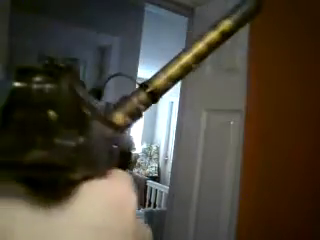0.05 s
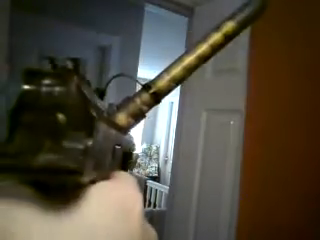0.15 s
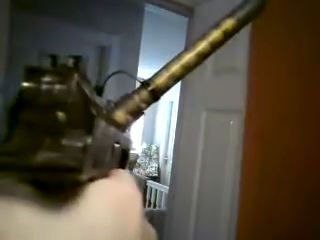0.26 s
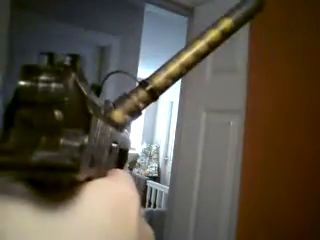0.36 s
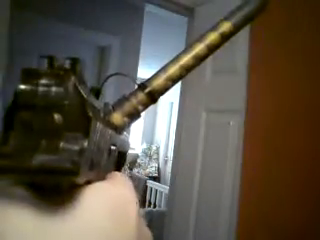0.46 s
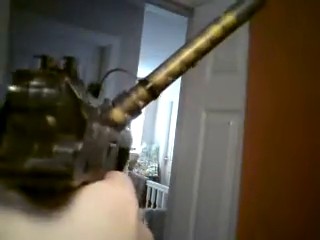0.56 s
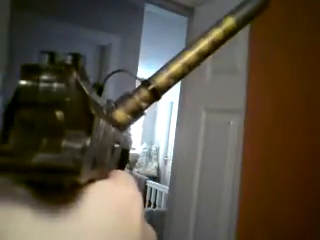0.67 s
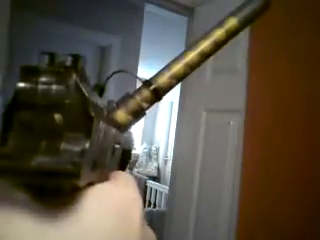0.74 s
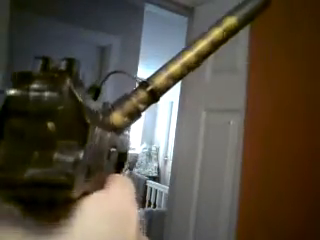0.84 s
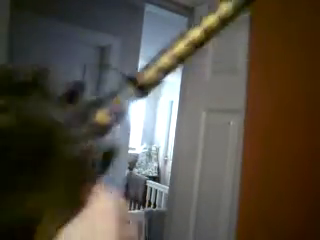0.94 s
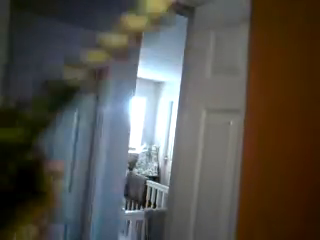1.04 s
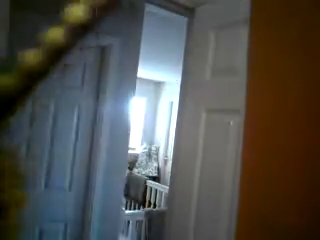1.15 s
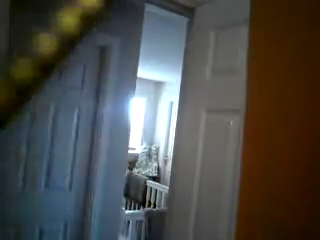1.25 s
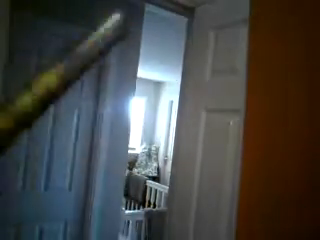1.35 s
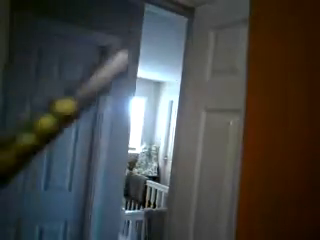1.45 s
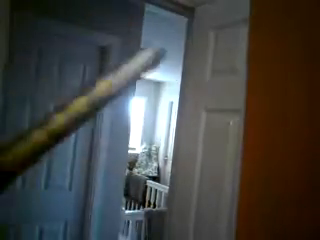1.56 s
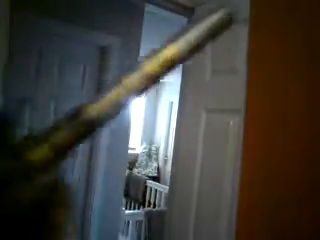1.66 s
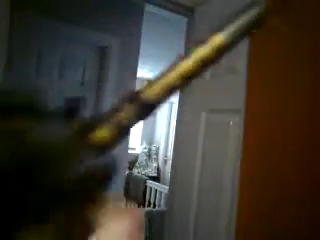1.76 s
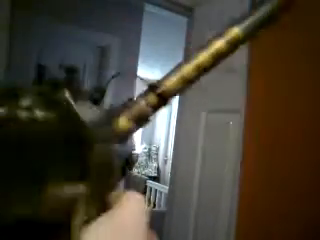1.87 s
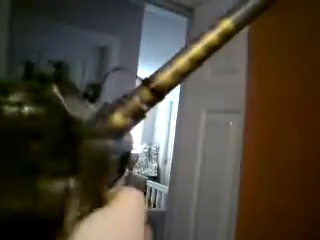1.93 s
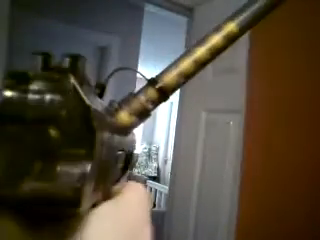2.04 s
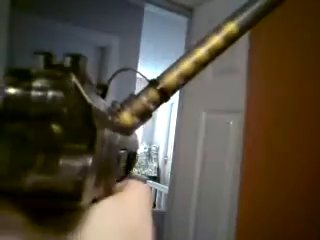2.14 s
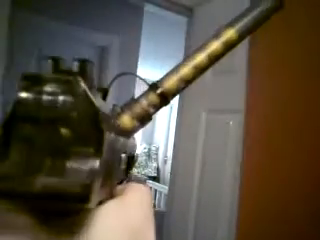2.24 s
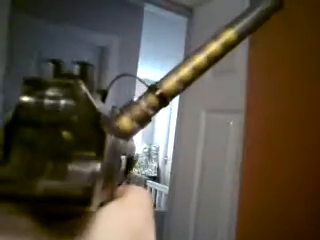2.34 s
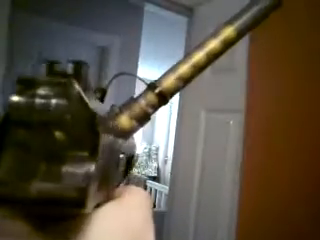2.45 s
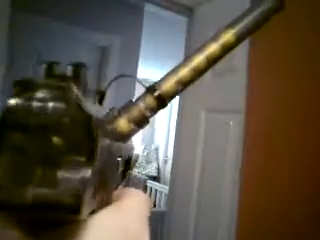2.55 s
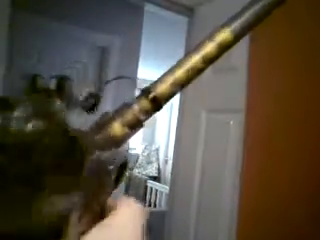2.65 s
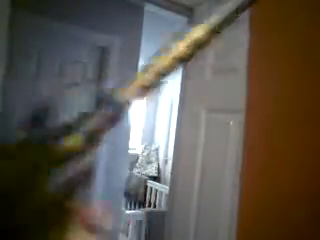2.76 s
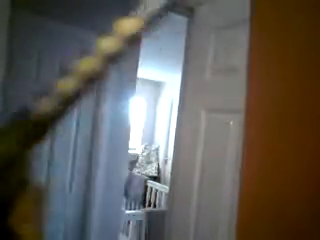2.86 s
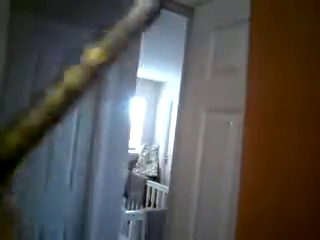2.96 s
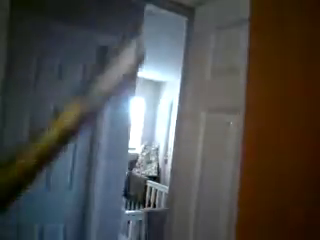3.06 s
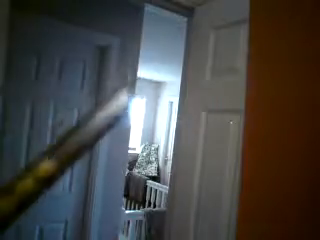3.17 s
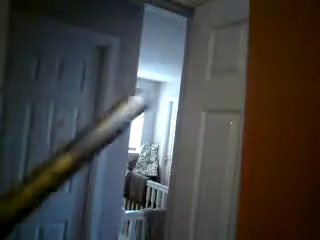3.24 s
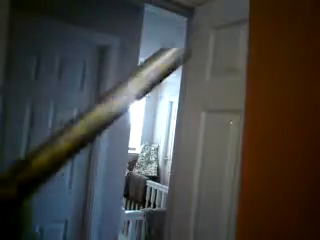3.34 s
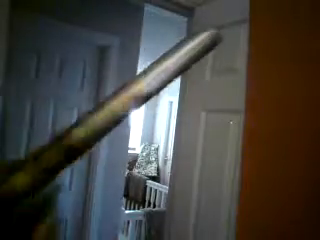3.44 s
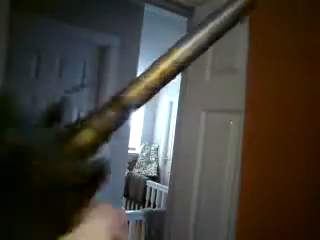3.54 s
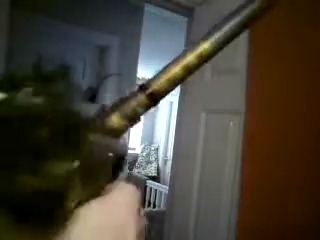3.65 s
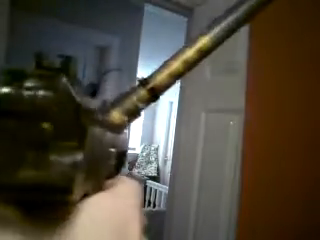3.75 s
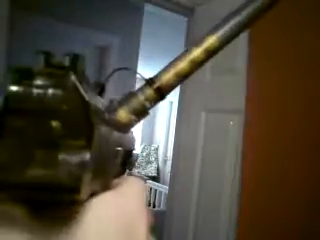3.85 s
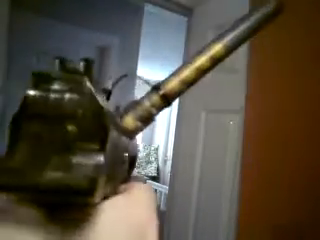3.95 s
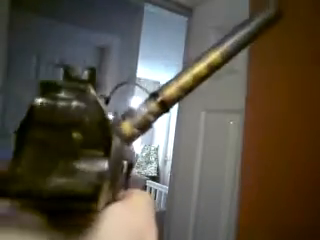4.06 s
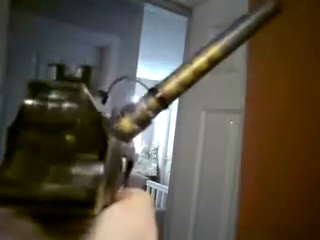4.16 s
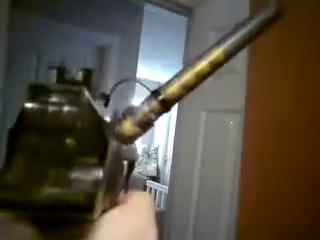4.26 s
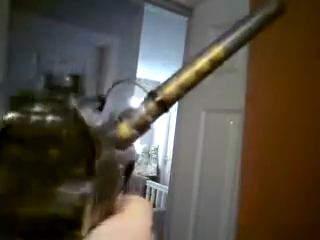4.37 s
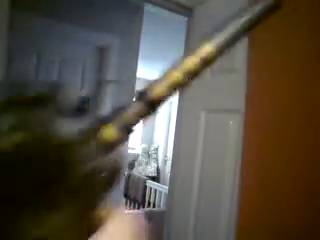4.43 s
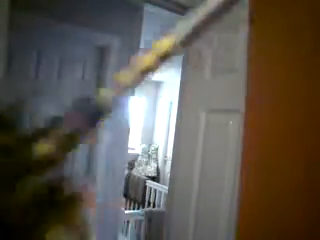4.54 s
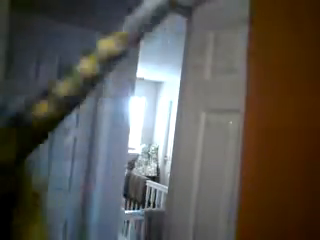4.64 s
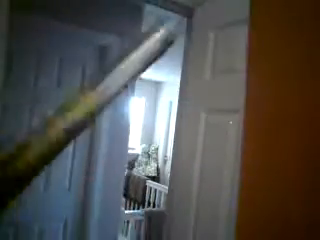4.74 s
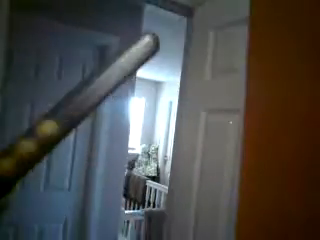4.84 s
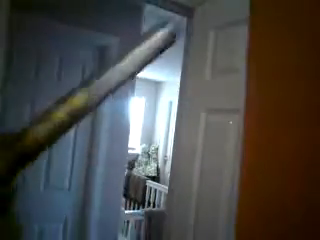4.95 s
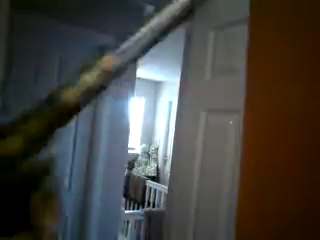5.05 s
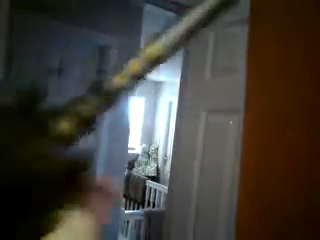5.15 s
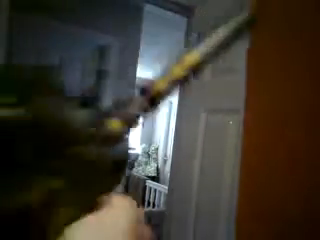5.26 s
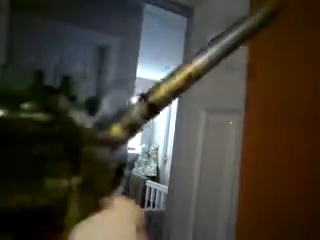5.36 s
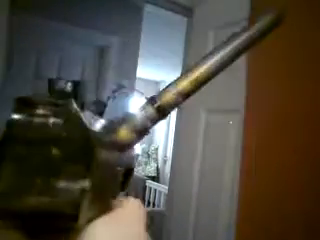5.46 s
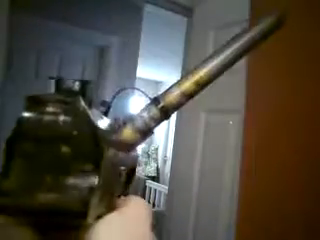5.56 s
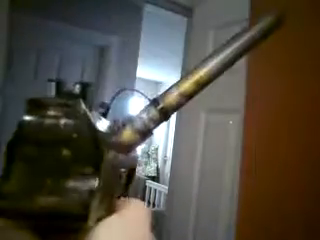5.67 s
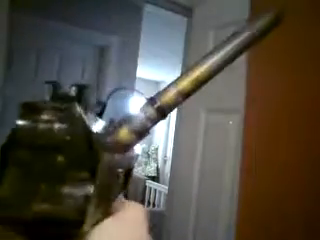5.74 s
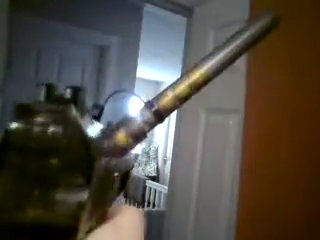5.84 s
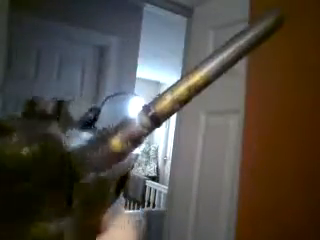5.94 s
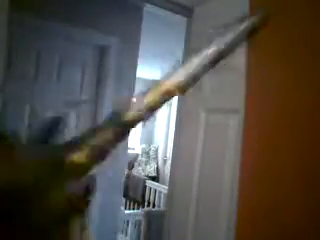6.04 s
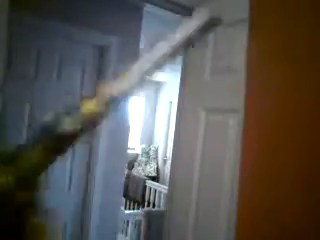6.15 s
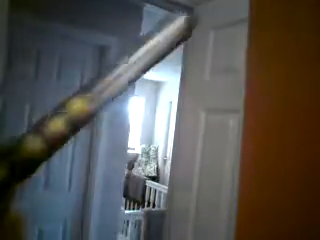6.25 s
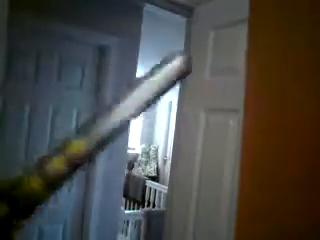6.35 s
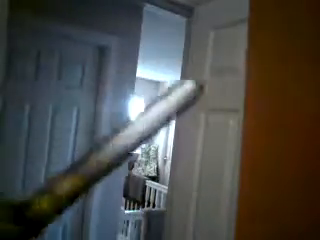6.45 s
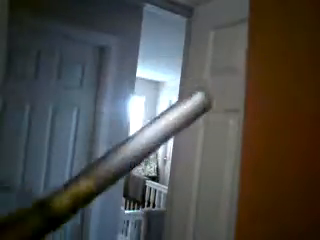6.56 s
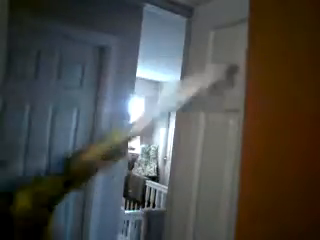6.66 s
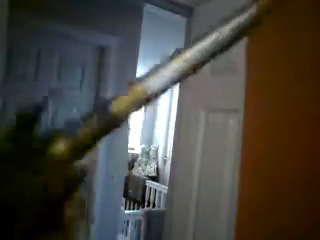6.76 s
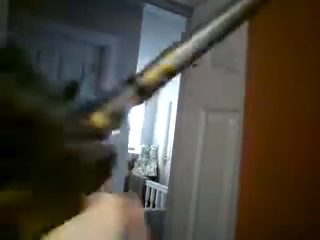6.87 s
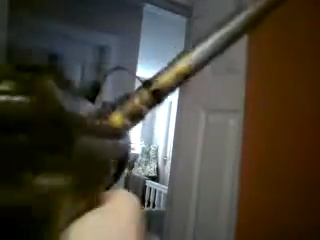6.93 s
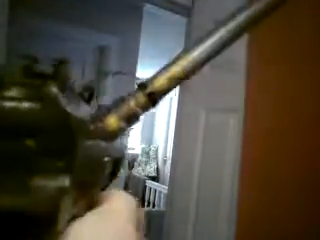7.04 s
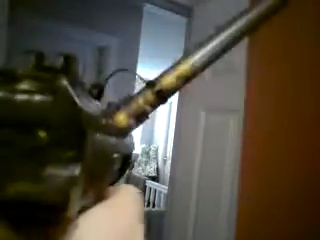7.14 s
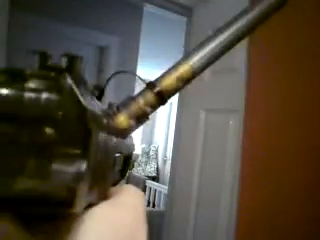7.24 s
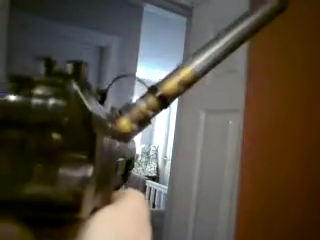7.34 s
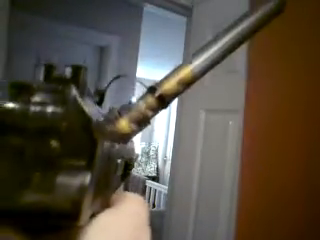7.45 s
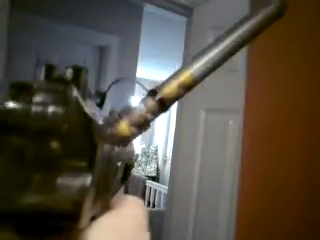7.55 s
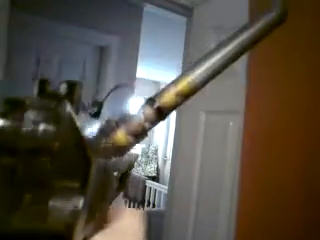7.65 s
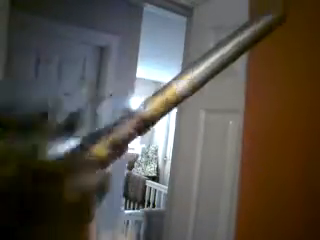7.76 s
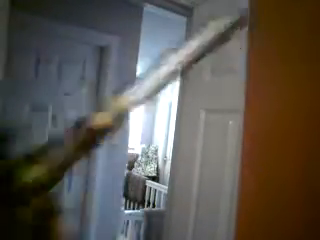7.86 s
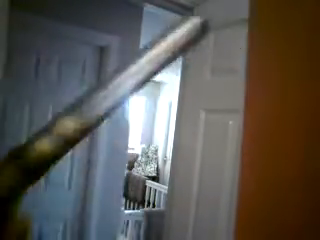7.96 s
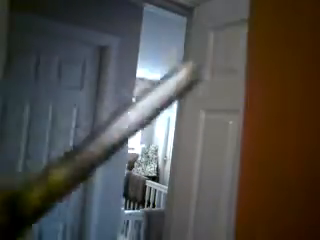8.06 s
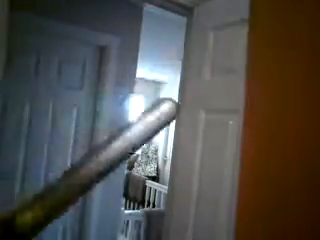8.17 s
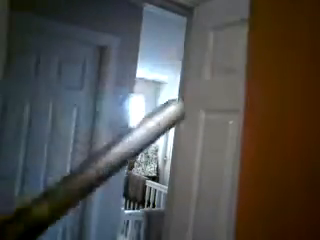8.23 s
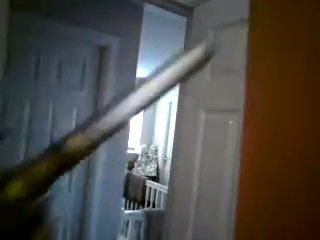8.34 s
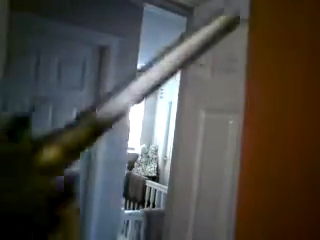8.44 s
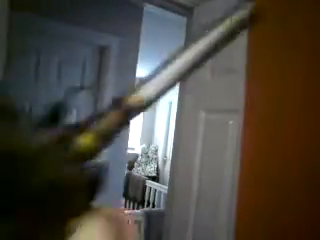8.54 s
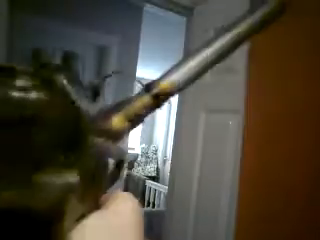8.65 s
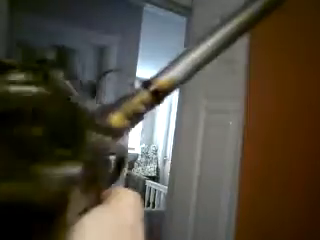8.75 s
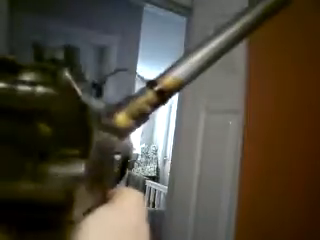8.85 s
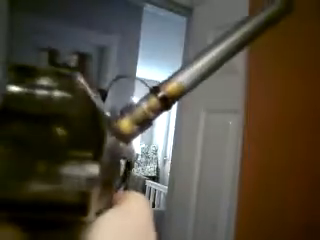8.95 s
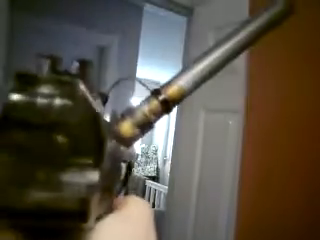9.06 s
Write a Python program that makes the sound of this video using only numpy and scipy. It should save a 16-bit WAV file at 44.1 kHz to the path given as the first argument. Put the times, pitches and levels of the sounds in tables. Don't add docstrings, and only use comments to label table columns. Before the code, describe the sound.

A pump paintball pistol is fired and worked very close to a small, cheap camera microphone in a hallway. Faint hiss and thin whine run throughout, with a tiny tick at the start. At 0.65 s a harsh gas blast bursts out, overloaded and flattened, echoing briefly through the rooms while a spring faintly rings. Around 1.3 s the slide rubs and rattles back, hits its stop at 1.4, clicks at 1.55 and slams home brightly at 1.65. Further shots come at 2.5, 4.2, 5.85 and 7.55 s, the second longest, the third loudest and shortest, the last softest. Pump cycles follow at about 3.1-3.4, 4.8-5.1, 6.4-6.8 and 8.1-8.45 s, the fourth pulled back hardest, the last slam softer and fuller. Between them are light ticks, grip rustle and dull hand bumps. The end settles into hiss.

```python
import sys
import numpy as np
from scipy import signal
from scipy.fft import rfft, irfft
from scipy.io import wavfile
from scipy.ndimage import uniform_filter1d, minimum_filter1d

SR = 44100
rng = np.random.default_rng(int(sys.argv[2]) if len(sys.argv) > 2 else 0)


def convert_level_to_amplitude(level_db):
    exponent = np.asarray(level_db, float) / 20
    return 10 ** exponent


def pcm_store(signal):
    levels = np.round(np.clip(np.atleast_2d(signal), -1, 1) * 32767)
    wavfile.write(sys.argv[1], SR, levels.astype(np.int16).T)


N = 401310
T = np.arange(N) / SR

# start in seconds, blast level in dB, spring level in dB, valve open time in seconds.
SHOTS = [
    (0.6494, -7.5, -44.5, 0.079),
    (2.4987, -8.5, -46, 0.094),
    (4.2163, -7, -44.5, 0.052),
    (5.8433, -8, -46.5, 0.074),
    (7.5487, -9, -51, 0.057),
]
# time in seconds, peak in dB.
STOPS = [
    (1.412, -10),
    (3.183, -10),
    (4.843, -11.5),
    (6.499, -8),
    (8.185, -9),
]
# time in seconds, peak in dB.
CATCHES = [
    (1.5521, -10),
    (3.3194, -9),
    (4.973, -15.5),
    (6.674, -8.5),
    (8.325, -14),
]
# time in seconds, peak in dB, strongest ring in Hz,
# slide effort in dB, share of low sound in dB.
HOMES = [
    (1.6476, -6.5, 3840, 6, -16.5),
    (3.407, -7.5, 3600, 7.5, -15),
    (5.086, -7, 1444, 6.5, -16.5),
    (6.768, -7, 1523, 4, -15.5),
    (8.436, -8.5, 2860, 5, -8.5),
]
# frequency in Hz, time to fade by 60 dB in seconds.
ROOM = [(100, .2), (400, 0.033), (1000, 0.33), (3500, 0.18), (7000, 0.33)]


def colour(x, table):
    hz, db = np.transpose(table)
    f = np.maximum(np.arange(len(x) // 2 + 1) * SR / len(x), 1)
    gain = convert_level_to_amplitude(np.interp(np.log(f), np.log(hz), db))
    return irfft(rfft(x) * gain / np.sqrt(np.mean(gain ** 2)), len(x))


def causal(table, size=1024):
    spike = np.zeros(size)
    spike[0] = 1
    cepstrum = irfft(np.log(np.abs(rfft(colour(spike, table))) + 1e-5), size)
    cepstrum[1:size // 2] *= 2
    cepstrum[size // 2 + 1:] = 0
    return irfft(np.exp(rfft(cepstrum)), size)


def band(x, lo_hz, hi_hz):
    return signal.sosfilt(signal.butter(3, [lo_hz, hi_hz], "band", fs=SR, output="sos"), x)


def add(out, x, s):
    i = int(s * SR)
    out[i:i + len(x)] += x[:len(out) - i]


def ring(modes):
    t = T[:int(SR * max(t60 for _, _, t60 in modes))]
    total = 0
    for hz, db, t60 in modes:
        tone = np.sin(2 * np.pi * (hz * t + rng.random()))
        total = total + convert_level_to_amplitude(db) * tone * 1000 ** (-t / t60)
    return total


def room(x, decays, fill_s):
    t, tail = T[:SR], 0
    hz, t60 = np.transpose(decays)
    for centre in 40 * 2. ** np.arange(9):
        decay = np.interp(np.log(centre), np.log(hz), t60)
        octave = band(rng.standard_normal(SR), centre / 2 ** .5, centre * 2 ** .5)
        tail = tail + octave * 1000 ** (-t / decay)
    tail *= 1 - np.exp(-t / fill_s)
    return signal.fftconvolve(x, tail / np.sqrt(np.sum(tail ** 2)))[:N]


def camera():
    # frequency in Hz, level in dB per Hz.
    hiss_colour = [(8.8, -41.5), (15, -9.5), (60, -16.5), (81, -14.5), (135, -18), (317, -14), (393, -12.5),
                   (438, -14.5), (690, -17), (926, -17), (2070, -18), (3530, -16), (3930, -18),
                   (7280, -20.5), (9020, -37), (11700, -73.5), (19800, -120)]
    # frequency in Hz, level in dB.
    whine_tones = [(2396, -93), (3569, -84), (4430, -92), (7133, -89.5)]
    # middle in seconds, level in dB, length in seconds.
    hand_bumps = [
        (1.21, -61, 0.043),
        (2.11, -68, 0.035),
        (4.705, -90, .03),
        (5.36, -62.5, 0.035),
        (5.739, -64.5, 0.095),
        (7.572, -71, 0.024),
    ]
    whine = sum(convert_level_to_amplitude(db + 6.5) * np.sin(2 * np.pi * hz * T) for hz, db in whine_tones)
    bumps = sum(convert_level_to_amplitude(db) * np.exp(-((T - s) / length) ** 2) for s, db, length in hand_bumps)
    rumble = convert_level_to_amplitude(12.0) * band(rng.standard_normal(N), 60, 600)
    hiss = convert_level_to_amplitude(-70.5) * colour(rng.standard_normal(N), hiss_colour)
    return hiss + whine + bumps * rumble


def ticks():
    # time in seconds, peak in dB, share of low sound in dB, strongest ring in Hz.
    tick_rows = [(.154, -49.5, -3, 2300), (1.064, -45.5, -12, 3230), (1.933, -53, -17, 3170),
                 (1.947, -43.5, -27, 3200), (2.908, -40.5, -6.5, 2230), (3.023, -44, -1.5, 740),
                 (3.602, -49, -5, 680), (3.705, -44.5, -22, 3320), (3.718, -41, -27, 3140),
                 (3.729, -43, -24, 3260), (3.969, -43.5, -6, 2000), (4.682, -49, -18, 3700),
                 (5.382, -46.5, -11.5, 3500), (5.72, -45, -3.5, 593), (6.245, -40, -4, 3200),
                 (6.352, -35, -.5, 3180), (7.053, -38.5, -25.5, 3830), (7.09, -45, -24, 2850),
                 (7.281, -41.5, -5, 2620), (8.044, -43.5, -0.5, 3650), (8.727, -43.5, -26, 3250),
                 (9.012, -58.5, 7, 1270)]
    return [(s, db, low_db, -34 - low_db, hz) for s, db, low_db, hz in tick_rows]


def clacks():
    # frequency in Hz, level in dB per Hz.
    knock_colour = [(59, -72.5), (100, -35), (505, -24.5), (658, -10.5), (825, -14), (1250, -9),
                    (2160, -12.5), (2410, -8), (2970, -6), (3450, -5), (5530, -16.5), (7760, -25.5),
                    (9020, -50.5), (11700, -82.5), (19800, -120)]
    # frequency in Hz, level in dB, time to fade by 60 dB in seconds.
    body_rings = [(700, -14, .012), (1550, -8, .012), (2500, -6, .01), (3500, 0, .015), (4700, -6, .008)]
    # frequency in Hz, level in dB, fade time in seconds.
    pump_spring = [(1167, -60, 1.2), (1528, -58, 1.6), (2280, -60, 1.6), (3052, -65, 1.8)]
    spring_levels = [0, -13, -4, -11, -6]
    # frequency in Hz, level in dB, fade time in seconds.
    rod_rings = [(3550, -28.5, .1), (3600, -17, 0.17), (3650, -30.5, .12), (2463, -33, .1)]

    near, walls, t = np.zeros(N), np.zeros(N), T[:2048]
    frame = np.zeros(len(t))
    add(frame, ring(body_rings), 0)
    knock = causal(knock_colour, size=2048) + convert_level_to_amplitude(-18) * frame / np.sqrt(np.sum(frame ** 2))
    crack = (np.exp(-t / .0013) + convert_level_to_amplitude(-15) * np.exp(-t / .008)) * (1 - np.exp(-t / .0004))
    shake = np.exp(-t / .006)
    contacts = pump_contacts() + trigger_contacts() + rattles() + slaps() + ticks()
    for s, db, low_db, high_db, hz in contacts:
        noise = rng.standard_normal((2, len(t))) * [crack, shake]
        both = signal.fftconvolve(noise, knock[None])[:, :len(t)]
        parts = [band(both, 160, 1800), band(both, 1800, 4500), band(both, 5000, 8500),
                 band(both, hz / 1.22, hz * 1.22)]
        low, mid, high, part = (p / np.sqrt(np.sum(p[:, :400] ** 2, axis=1, keepdims=True)) for p in parts)
        part_gain = convert_level_to_amplitude([[-4], [-9]])
        hit, spread = mid + convert_level_to_amplitude(low_db) * low + convert_level_to_amplitude(high_db) * high + part_gain * part
        peak = np.abs(hit).max()
        add(near, convert_level_to_amplitude(db) * hit / peak, s)
        add(walls, convert_level_to_amplitude(db) * spread / peak, s)
    for (s, *_), db in zip(HOMES, spring_levels):
        add(near, convert_level_to_amplitude(db) * ring(pump_spring), s)
    for s, db in STOPS:
        add(near, convert_level_to_amplitude(db) * ring(rod_rings), s)
    for s, db in STOPS + [row[:2] for row in HOMES]:
        thud = band(rng.standard_normal(len(t)) * np.exp(-t / .008), 260, 580)
        add(near, convert_level_to_amplitude(db - 37) * thud / np.abs(thud).max(), s)
    return near + convert_level_to_amplitude(-4.5) * room(walls, ROOM, 0.00043)


def blasts():
    # frequency in Hz, level in dB per Hz.
    gas_colour = [(18, -57.5), (30, -42), (149, -23.5), (239, -19.5), (415, -9.5), (653, -17.5),
                  (829, -11.5), (1030, -12), (1660, -11.5), (1910, -11.5), (3310, 0), (4510, -3),
                  (7450, -18.5), (8200, -17), (9020, -49.5), (11700, -82), (19800, -120)]
    # frequency in Hz, time to fade by 60 dB in seconds.
    hall_decays = [(100, 1), (400, 0.47), (1000, 0.62), (3500, 0.43), (7000, 0.52)]
    # frequency in Hz, level in dB, fade time in seconds.
    main_spring = [(895, 0, 1.1), (1043, -10, 1.1), (1404, -8, .9), (3243, -7, .9), (3373, -8, .9)]
    overload = .235

    gas, springs, t = np.zeros(N), np.zeros(N), T[:SR // 5]
    lead = T[:SR // 50]
    for s, db, spring_db, open_s in SHOTS:
        leak = rng.standard_normal(len(lead)) * np.exp((lead - lead[-1]) / 0.0072)
        add(gas, convert_level_to_amplitude(-33) * leak, s - lead[-1])
        fade = np.exp(-t / 0.043 - (t / open_s) ** 4)
        rush = rng.standard_normal(len(t)) * fade * (1 - np.exp(-t / 0.00032))
        add(gas, convert_level_to_amplitude(db) * rush, s)
        add(springs, convert_level_to_amplitude(spring_db) * ring(main_spring), s)
    gas = signal.fftconvolve(gas, causal(gas_colour, size=4096))[:N]
    air = gas + convert_level_to_amplitude(-9.0) * room(gas, hall_decays, 0.002)
    flat = air / (1 + (air / overload) ** 6) ** (1 / 6)
    return band(band(flat, 17, 11000), 17, 6100) + springs


def trigger_contacts():
    # seconds after the shot, peak in dB, low share in dB, high share in dB, strongest ring in Hz.
    with_shot = [
        (-.011, -29, -16.5, -3.5, 3100),
        (-.0055, -22, -9.5, -5.5, 3177),
    ]
    return [(shot[0] + lag, *rest) for shot in SHOTS for lag, *rest in with_shot]


def slaps():
    # time in seconds, peak in dB.
    slap_rows = [(.7213, -17), (.8147, -42), (2.5679, -15), (2.6631, -41), (4.2596, -15), (4.2808, -15),
                 (4.3007, -15), (4.3202, -36), (5.8942, -12), (5.9125, -15), (5.9941, -39), (7.5922, -15),
                 (7.7004, -37), (7.716, -47)]
    # low share in dB, high share in dB, strongest ring in Hz.
    slap_tone = (-18, -7.5, 3600)
    return [(s, min(db, -15), *slap_tone) for s, db in slap_rows]


def rubbing():
    # frequency in Hz, level in dB per Hz.
    rub_colour = [(59, -27), (100, -12), (256, -17.5), (310, -4.5), (347, -8.5), (1370, 0.5), (1620, -3),
                  (3940, 8.5), (7330, -14.5), (9020, -37), (11700, -79.5), (19800, -120)]
    # middle in seconds, level in dB, length in seconds.
    grip_shifts = [(1.202, -58.5, 0.068), (1.94, -65, 0.044), (2.265, -74.5, 0.13), (2.98, -61, 0.062),
                   (3.56, -87.5, 0.023), (3.734, -75, 0.034), (4.699, -59.5, 0.062), (5.379, -66, 0.07),
                   (5.727, -66.5, 0.032), (6.286, -62, 0.055), (7.082, -70, 0.025), (7.309, -70, .035),
                   (8.025, -62.5, .06), (8.73, -66, .045)]
    # time in seconds, slide effort in dB.
    pulls = [
        (1.324, 2.5),
        (3.082, 0.5),
        (4.767, 6.5),
        (6.421, 8),
        (8.107, 3),
    ]
    # moment of the cycle, seconds after it, level in dB.
    slide_cycle = [
        ("start", -0.004, -70.5),
        ("start", .035, -50.5),
        ("stop", 0.0015, -46.5),
        ("catch", -0.029, -64),
        ("catch", -.003, -54.5),
        ("home", -.045, -54),
        ("home", -0.0022, -47.5),
        ("home", 0.02, -53.5),
        ("home", 0.28, -81.5),
    ]
    gain = sum(convert_level_to_amplitude(db) * np.exp(-((T - s) / length) ** 2) for s, db, length in grip_shifts)
    for (start, pull_db), (stop, _), (catch, _), (home, _, _, push_db, _) in zip(pulls, STOPS, CATCHES, HOMES):
        at = dict(start=(start, pull_db), stop=(stop, pull_db), catch=(catch, push_db), home=(home, push_db))
        points = [(at[mark][0] + lag, at[mark][1] + db) for mark, lag, db in slide_cycle]
        s, db = np.transpose(points)
        gain = gain + convert_level_to_amplitude(np.interp(T, s, db, -150, -150))
    steps = np.repeat(convert_level_to_amplitude(3 * rng.standard_normal(N // 128 + 1)), 128)[:N]
    slips = uniform_filter1d(steps, 64)
    return gain * colour(slips * rng.standard_normal(N), rub_colour)


def rattles():
    # time in seconds, peak in dB.
    slide_rattles = [(1.323, -36), (1.351, -38), (1.355, -36), (1.375, -23.5), (1.394, -15), (1.401, -16.5),
                     (3.081, -45), (3.09, -57), (3.103, -44.5), (3.117, -33), (3.141, -21.5),
                     (3.162, -16.5), (3.168, -15.5), (4.767, -33), (4.781, -27), (4.802, -21.5),
                     (4.824, -16), (6.42, -43.5), (6.435, -42.5), (6.446, -21), (6.464, -18.5),
                     (6.479, -14.5), (8.107, -38), (8.11, -32.5), (8.121, -30.5), (8.141, -25),
                     (8.167, -17), (8.173, -22.5)]
    # time in seconds, peak in dB.
    loose_parts = [
        (1.449, -25.5),
        (1.512, -22.5),
        (1.613, -47),
        (3.389, -36.5),
        (4.949, -32),
        (5.046, -28),
        (6.698, -49.5),
        (8.336, -25),
        (8.396, -22.5),
    ]
    return [(s, db, -16 - 0.4 * db, -13, 3530) for s, db in slide_rattles + loose_parts]


def pump_contacts():
    # low share in dB, high share in dB, strongest ring in Hz.
    stop_tone = (-13, -10.5, 3400)
    catch_tone = (-13.5, -10, 3760)
    # time in seconds, peak in dB.
    bounces = [
        (1.419, -15),
        (3.189, -21.5),
        (4.851, -22),
        (6.506, -31),
        (8.193, -17),
    ]
    # time in seconds, peak in dB.
    near_catch = [
        (1.542, -32),
        (3.311, -29),
        (6.664, -28.5),
        (8.312, -36),
    ]
    # time in seconds, peak in dB.
    near_home = [
        (1.633, -22),
        (3.394, -20),
        (5.07, -21),
        (6.754, -19.5),
        (8.421, -19.5),
    ]
    # low share in dB, high share in dB, strongest ring in Hz.
    bounce_tone = (-7.5, -16, 3800)
    near_catch_tone = (-18, -16, 3900)
    near_home_tone = (-17, -5, 4680)
    # seconds after it, peak in dB,
    # low share in dB, high share in dB, strongest ring in Hz.
    with_catch = [
        (-.002, -22, -8.5, -16, 3600),
    ]
    with_home = [
        (-.002, -16, -1.4, -12.5, 2700),
    ]

    rows = [(s, db, low_db, -12, hz) for s, db, hz, _, low_db in HOMES]
    for table, tone in ((STOPS, stop_tone), (CATCHES, catch_tone), (bounces, bounce_tone),
                        (near_catch, near_catch_tone), (near_home, near_home_tone)):
        rows += [(s, db, *tone) for s, db in table]
    for mains, small in ((CATCHES, with_catch), (HOMES, with_home)):
        rows += [(main[0] + lag, *rest) for main in mains for lag, *rest in small]
    return rows


def scene():
    rub = rubbing()
    return (blasts() + clacks() + rub + convert_level_to_amplitude(-6) * room(rub, ROOM, .002) + camera())[None]


def starve(x, size=512):
    # frequency in Hz, depth in dB.
    spared_depth = [(2000, 36), (4500, 22), (6000, 13), (9000, 9)]
    hz, _, z = signal.stft(x, SR, nperseg=size)
    db = 10 * np.log10(np.sum(np.abs(z) ** 2, axis=0) + 1e-20)
    click = -minimum_filter1d(-db, 13)
    shadow = np.minimum(click - db, 17) * (click > db.max() - 24)
    group = np.arange(len(hz)) // 7
    luck = 6 * rng.standard_normal((group[-1] + 1, len(db) // 2 + 1))
    luck = np.repeat(luck, 2, axis=1)[:, :len(db)]
    spared = np.interp(hz[group * 7], *np.transpose(spared_depth))[:, None] + np.clip(luck[group], -9, 9)
    kept = (spared > shadow) | (shadow < 7.5)
    return signal.istft(z * np.where(kept, 1, .01), SR, nperseg=size)[1][:N]


def low_pass(x):
    return signal.sosfilt(signal.butter(12, 9170, fs=SR, output="sos"), x)


def record(dry):
    flat = starve(np.tanh(dry[0] / .6) * .6)[None]
    flat = signal.sosfilt(signal.ellip(12, .2, 100, 8900, fs=SR, output="sos"), flat)
    flat = signal.sosfilt(signal.butter(2, 8000, fs=SR, output="sos"), flat)
    return low_pass(flat)


dry = scene()
out = record(dry)
pcm_store(out)
```